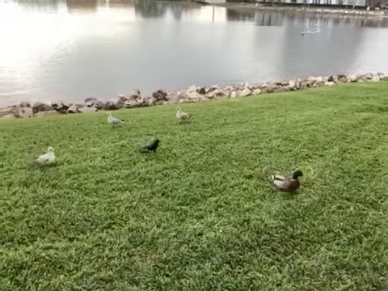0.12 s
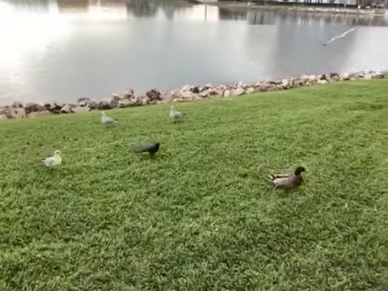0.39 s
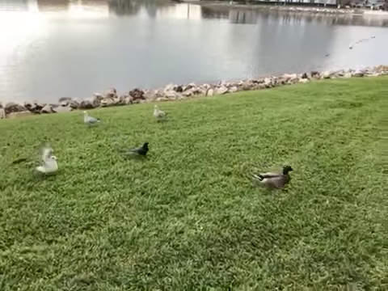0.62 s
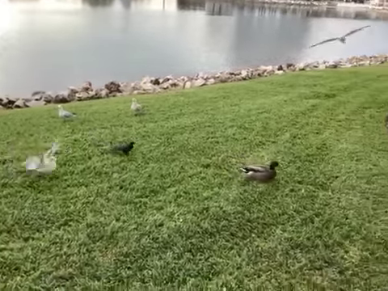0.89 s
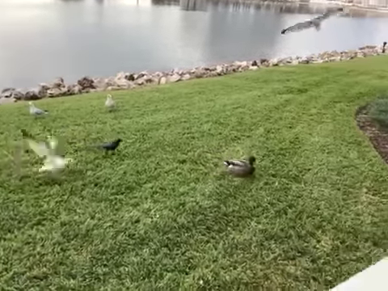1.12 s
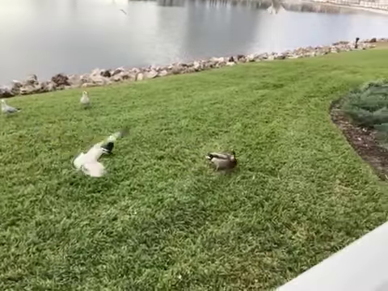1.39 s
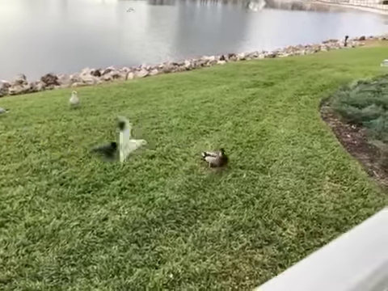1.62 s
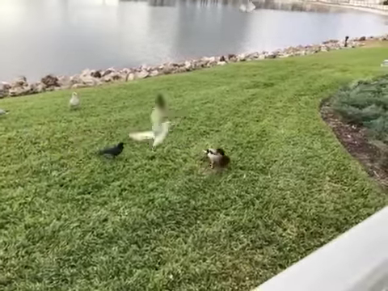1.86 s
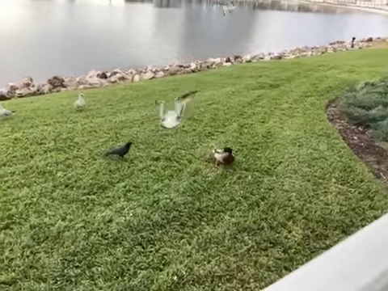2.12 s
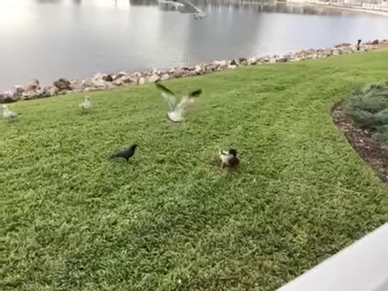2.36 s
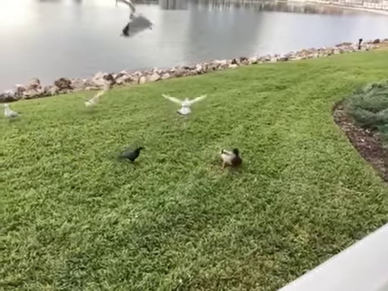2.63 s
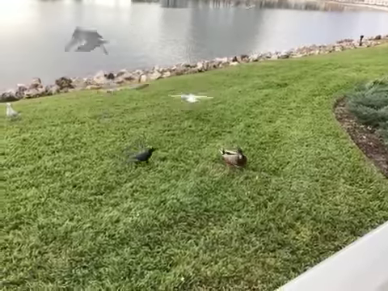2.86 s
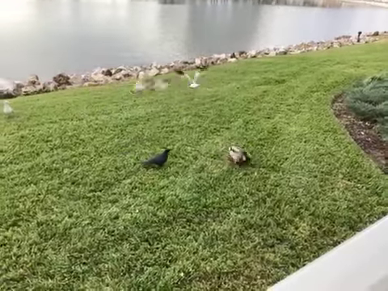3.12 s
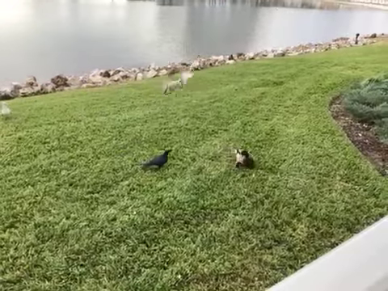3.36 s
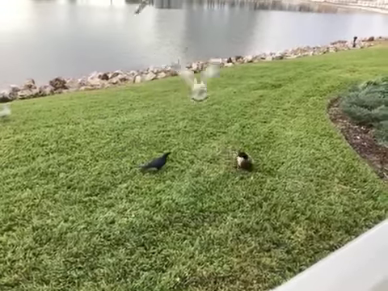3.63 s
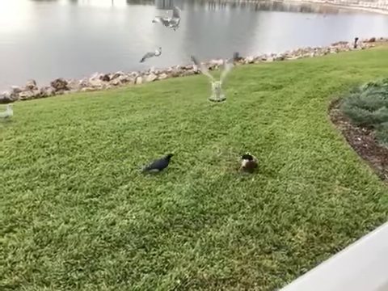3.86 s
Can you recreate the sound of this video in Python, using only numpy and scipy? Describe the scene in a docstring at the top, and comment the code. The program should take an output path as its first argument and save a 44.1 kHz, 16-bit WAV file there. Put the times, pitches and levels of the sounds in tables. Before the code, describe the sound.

Sharp gull cries over rough crow caws, faint quacking and a low outdoor rumble

```python
"""Gulls cry twice over a lawn beside a pond: two pitched sides of the syrinx sound at once and mix,
giving sum and difference tones. A crow caws three times and a duck quacks softly throughout, both
made of membrane pulses and puffs of noise through a throat or bill; a far bird calls faintly the same way.
Town rumble and airy hiss, shaped from noise, lie under all, with short noise-tail echoes off the bank."""
import sys
import numpy as np
from scipy import signal
from scipy.fft import rfft, irfft
from scipy.io import wavfile
from scipy.ndimage import uniform_filter1d, map_coordinates

SR = 44100
rng = np.random.default_rng(int(sys.argv[2]) if len(sys.argv) > 2 else 0)


def invert_db(level):
    """Linear amplitude ratio for a level in decibels (20 dB per decade), elementwise."""
    return 10 ** (np.asarray(level, dtype=float) / 20)


def master(y):
    """Save y as 16-bit WAV."""
    cut = np.clip(np.atleast_2d(y).T, -1, 1)
    pcm = np.round(cut * 32767)  # scale
    wavfile.write(sys.argv[1], SR, pcm.astype(np.int16))


N = 176400
T = np.arange(N) / SR  # seconds


def unit(x):
    """Scaled to rms 1."""
    return x / np.sqrt(np.mean(x ** 2) + 1e-20)


def along(points, hz):
    """Reads a curve of (Hz, value) points on a log frequency axis."""
    f, v = np.transpose(points)
    return np.interp(np.log(hz + 1), np.log(f + 1), v)


def wobble(rate):
    """A smooth random curve, rate knots a second."""
    return map_coordinates(rng.standard_normal(N // 20), [T * rate])


def spell(start, end):
    """A gate from 0 to 1 that fades in and out between two times in seconds."""
    return np.clip(np.minimum(T - start, end - T) / 0.018, 0, 1)


def coloured(x, points):
    """Filters x to the gain of (Hz, dB) points; a pulse swells and fades, its lows a little late."""
    size = 4096
    smear = 7  # phase lag in radians per unit of log frequency
    hz = np.fft.rfftfreq(size, 1 / SR)
    response = invert_db(along(points, hz)) * np.exp(-1j * smear * np.log(hz + 1))
    kernel = np.fft.fftshift(irfft(response, size))
    return signal.fftconvolve(x, kernel)[size // 2:][:N]


# Spectrum of the town rumble and hiss. Each row: frequency in Hz, relative level in dB.
AIR_SPECTRUM = [(25, -46), (39, -15), (60, 0), (115, 2.5), (160, -0.5), (250, -9.5), (420, -9),
                (800, -13.5), (1600, -17), (2500, -21), (4000, -25), (6300, -27.5), (8000, -26),
                (10000, -15), (12500, -30), (15700, -38)]


def air(level_db=-44.5, patchy_db=1, drift_db=.6):
    """Town rumble and hiss: shaped noise, slightly patchy in time and pitch, drifting in level."""
    z = signal.stft(rng.standard_normal(N), nperseg=512)[2]
    patches = uniform_filter1d(rng.standard_normal(z.shape), size=8, axis=0)
    patches = uniform_filter1d(patches, size=14, axis=1)
    noise = signal.istft(z * invert_db(patchy_db * unit(patches)), nperseg=512)[1][:N]
    gain = invert_db(along(AIR_SPECTRUM, np.fft.rfftfreq(N, 1 / SR)))
    shaped = irfft(rfft(noise) * gain, N)
    return invert_db(level_db + drift_db * wobble(2.633)) * unit(shaped)


# How long the bank echoes. Each row: frequency in Hz, time to die by 60 dB in seconds.
BANK_DECAY = [(500, 0.23), (4000, 0.34), (10000, 0.26)]


def bank(x):
    """Scattered echoes: a noise tail, each frequency dying at its own speed."""
    hz, t, z = signal.stft(rng.standard_normal(SR // 2), SR, nperseg=256)
    fade = invert_db(-60 * t / along(BANK_DECAY, hz)[:, None])
    tail = signal.istft(z * fade, SR, nperseg=256)[1]
    late = np.pad(x, (400, 0))  # delay in samples
    return signal.fftconvolve(late, tail / np.linalg.norm(tail))[:N]


def calls(rows, throat, attack_s, release_s, sag, noise, duty, jitter, scatter_db, arch=0,
          voiced=((1000, 0),)):
    """Membrane pulses with a puff of noise each cycle; the rate arches and sags, the bill opens."""
    gape_hz, gape_shift = 2200, .07  # an open bill lifts resonances above gape_hz by this share
    rate, level, gape = np.full(N, float(rows[0][2])), np.zeros(N), np.zeros(N)
    chances = rng.uniform(-1, 1, (len(rows), 2))
    for (s, length, hz, db), (start, detune) in zip(rows, chances):
        u = np.clip((T - s) / length, 0, 1)  # progress through the call
        begun = T > s - .01
        bend = 1 + jitter * detune - sag * (u - .5) + arch * np.sin(np.pi * u)
        rate = np.where(begun, hz * bend, rate)
        gape = np.where(begun, np.clip(u + start / 2, 0, 1), gape)
        ramp = np.minimum((T - s) / attack_s, 1 + (s + length - T) / release_s)
        level += invert_db(db) * np.sin(np.pi / 2 * np.clip(ramp, 0, 1)) ** 2
    turns = np.cumsum(rate * (1 + jitter * wobble(250))) / SR  # membrane cycles so far
    nearest = np.round(turns)
    size = invert_db(scatter_db * rng.standard_normal(N))[nearest.astype(int)]  # one strength per cycle
    pulses = np.diff(np.floor(turns), prepend=0) * size
    puffs = rng.standard_normal(N) * np.exp(-np.abs(turns - nearest) / duty) * size
    source = np.sqrt(1 - noise) * coloured(unit(pulses), voiced) + np.sqrt(noise) * unit(puffs)
    wide = [(hz * (1 + gape_shift * (hz > gape_hz)), db) for hz, db in throat]
    shut, opened = np.sqrt(1 - gape), np.sqrt(gape)
    voice = coloured(shut * source, throat) * shut + coloured(opened * source, wide) * opened
    return level * unit(voice)


# Faint calls. Each row: start in seconds, length before the fade in seconds,
# nominal pulse rate in Hz, level in dB.
FAR_CALLS = [(.875, 0.066, 438, -45.5), (.95, 0.086, 405.6, -45.5), (2.01, 0.059, 437, -44.5)]
# Throat resonances of the far bird. Each row: frequency in Hz, gain in dB.
FAR_RESONANCES = [(500, -30), (850, -15), (1250, 0), (1650, -17), (2350, -9), (3300, -35)]


def far_bird():
    """Short, nearly pure pulsed calls: quick attack, falling rate, little noise."""
    return calls(FAR_CALLS, FAR_RESONANCES, attack_s=0.0027, release_s=0.021, sag=.16,
                 noise=.06, duty=0.48, jitter=.006, scatter_db=1.5)


# Soft quacks. Each row: start in seconds, level in dB.
QUACK_TIMES = [(0.361, -49.5), (0.532, -47), (0.934, -44), (1.097, -38.5), (1.384, -37.5), (1.675, -38.5),
               (1.816, -37.5), (2.125, -38.5), (2.278, -38), (2.58, -41), (2.74, -38.5), (3.079, -42.5),
               (3.244, -38.5), (3.539, -38), (3.698, -35.5), (3.948, -39.5)]
# Bill resonances of the duck. Each row: frequency in Hz, gain in dB.
QUACK_RESONANCES = [(700, -61), (1400, -11.5), (1930, 2.5), (2400, -5), (2900, -11), (3500, -19.5),
                    (4500, -16), (4900, -10.5), (5600, -10.5), (6800, -16), (8500, -39)]
# Tone of the pulses, which fade under the noise in the treble. Each row: frequency in Hz, gain in dB.
QUACK_PULSE_TONE = [(2500, -6), (4500, -13)]


def duck():
    """Slow membrane pulses with tight puffs of noise, ringing the bill."""
    length_s, pulse_hz = .045, 118.05  # before the fade; nominal rate
    quacks = [(s, length_s, pulse_hz, db) for s, db in QUACK_TIMES]
    return calls(quacks, QUACK_RESONANCES, attack_s=.018, release_s=.035, sag=.05,
                 noise=.42, duty=.25, jitter=.04, scatter_db=1.5, voiced=QUACK_PULSE_TONE)


# Caws. Each row: start in seconds, length before the fade in seconds,
# nominal pulse rate in Hz, level in dB.
CAW_CALLS = [(.66, 0.16, 307.5, -30.5), (1.1, 0.16, 316.2, -30.5), (1.555, 0.155, 317, -31.5)]
# Throat resonances of the crow. Each row: frequency in Hz, gain in dB.
CAW_RESONANCES = [(1000, -23), (1250, -13.5), (1560, -2.5), (1900, -14.5), (2600, -27), (3550, -30),
                  (4000, -9.5), (4400, -21), (5450, -6.5), (6300, -11.5), (9000, -4.5), (10200, -1),
                  (11600, -18), (15500, -39)]
# Tone of the pulses, which lead the noise in the low resonance. Each row: frequency in Hz, gain in dB.
CAW_PULSE_TONE = [(2200, 6.5), (4500, -2)]


def crow():
    """Rough caws: fast pulses and about as much noise, the rate arching slightly as it falls."""
    return calls(CAW_CALLS, CAW_RESONANCES, attack_s=.07, release_s=.065, sag=.13,
                 noise=.55, duty=.48, jitter=.015, scatter_db=1.5, arch=.03, voiced=CAW_PULSE_TONE)


def syrinx(cries, partials, spells=(), halved=0):
    """One side of the gull: trembling partials on its pitch, fluttering and hoarse in spells."""
    pivot_hz, onset_s = 4140, 0.011  # brightness turns about pivot_hz
    jitter, hoarse_jitter = 0.00345, .024  # share of the pitch
    tremble_db, chatter_db = 3, 7  # hoarse partials break up
    upper_lean, hoarse_depth = .9, 1.2  # the upper flutter side tones lead
    out = np.zeros(N)
    waver = np.cumsum(1 + .06 * wobble(40)) * 2 * np.pi / SR  # unsteady clock for the flutter
    rough = sum(spell(a, b) * hoarse for a, b, _, _, hoarse in spells)
    swell = sum(spell(a, b) * depth * (2 * np.cos(hz * waver) + np.cos(2 * hz * waver))
                for a, b, depth, hz, _ in spells)
    sway = sum(spell(a, b) * depth * upper_lean * np.sin(hz * waver) for a, b, depth, hz, _ in spells)
    for rows, levels in zip(cries, partials):
        s, *cols = np.transpose(rows)
        hz, db, bright_db = [np.interp(T, s, c) for c in cols]
        unsteady_hz = hz * (1 + (jitter + hoarse_jitter * rough) * wobble(300))
        phase = 2 * np.pi * np.cumsum(unsteady_hz) / SR
        gate = np.clip(np.minimum(T - s[0], s[-1] - T) / onset_s, 0, 1)
        tone = np.zeros(N)
        for k, partial_db in enumerate(levels, 1):
            tilt_db = bright_db * np.log2(k * hz / pivot_hz)
            shake_db = (tremble_db + chatter_db * rough) * wobble(120)
            wave = np.sin(k * phase + sway + rng.uniform(0, 2 * np.pi))
            tone += invert_db(partial_db + tilt_db + shake_db) * wave
        beat = 1 + swell + 2 * halved * np.cos(phase / 2) + hoarse_depth * rough * wobble(600)
        out += gate * invert_db(db) * np.sqrt(2) * tone * beat
    return out


# Low side of the syrinx, one list per cry section.
# Each row: time in seconds, pitch in Hz, level before partials and tilt in dB, brightness in dB per octave.
LOW_CRIES = [
    [(1.776, 1527, -52, 22), (1.782, 1481, -22, -2), (1.796, 1517, -20.5, 0.5), (1.882, 1511, -49, 22),
     (1.898, 1506, -37, -4), (1.945, 1550, -65, 16)],
    [(1.935, 1447, -30, 2), (1.955, 1383, -38, 2), (2.085, 1265, -49, -2), (2.12, 1270, -77, 4)],
    [(3.236, 1967, -66, -2), (3.246, 1945, -19, 4.5), (3.27, 1828, -24, 4.5), (3.305, 1863, -31.5, -20)],
    [(3.455, 1554, -41, 6.5), (3.553, 1664, -36, 4), (3.6, 1720, -38, -1)],
    [(3.583, 1785, -49, -13), (3.603, 1754, -34, 5.5), (3.629, 1642, -37.5, 6), (3.649, 1623, -32.5, 4.5),
     (3.771, 1755, -34.5, 0), (3.789, 1708, -36, -4.5), (3.813, 1644, -46, -1), (3.847, 1640, -35, 0.5),
     (3.903, 1662, -45.5, -1.5), (3.925, 1720, -40.5, 5), (3.99, 1730, -67, -18)],
]
# Relative levels in dB of partials 1 to 8, one list for each low section.
LOW_PARTIALS = [
    [-34, 0, -26, -8, -21, -14, -34, -40],
    [-5, 2, -14, 0, -7, -5.5, -12.5, -14.5],
    [-24, 1.5, -18, -5.5, -28, -24, -53, -55],
    [-23, -9, 1.5, -34, -8.5, -7.5, -19, -22],
    [-5.5, 3, -1.5, -6.5, -8, 2, -18, -27],
]
# Flutter of the low side. Each row: start in seconds, end in seconds, depth 0-1, flutter rate in Hz,
# hoarseness 0-1.
LOW_FLUTTERS = [(1.791, 1.952, 0.05, 590, 0.28), (1.961, 2.12, 0.28, 447.5, 0.36),
                (3.482, 3.577, 0.17, 492, .1), (3.689, 3.775, 0.24, 544, 0.12),
                (3.783, 3.873, 0.36, 458.4, 0.22), (3.885, 3.97, 0.45, 487, 0.19)]
# High side of the syrinx, one list per cry section.
# Each row: time in seconds, pitch in Hz, level before partials and tilt in dB, brightness in dB per octave.
HIGH_CRIES = [
    [(1.772, 4130, -50, 6), (1.798, 4150, -46, 0), (1.81, 4110, -38.5, -4.5), (1.86, 4345, -44, 4),
     (1.92, 4473, -51.5, 10.5), (1.97, 4487, -59, 6)],
    [(3.222, 4830, -87, 13), (3.236, 4970, -54, 16.5), (3.256, 5800, -84, 7)],
    [(3.302, 4460, -43, -21), (3.312, 4498, -21.5, -7.5), (3.384, 4330, -39, -5),
     (3.408, 4182, -36.5, -1.5), (3.464, 4192, -42, 2), (3.508, 4327, -34, -9.5), (3.548, 4510, -36, -1.5),
     (3.62, 4513, -47, -5)],
]
# Relative levels in dB of partials 1 to 3 of every high section.
HIGH_PARTIALS = [9, 10, -16]
# The high side repeats only every second cycle. One row: start in seconds, end in seconds, depth 0-1.
HALVED_SPELL = (3.336, 3.47, 0.2)
# Tone filter on the mixing tones and breath, bright around 7 to 10 kHz as the microphone hears it.
# Each row: frequency in Hz, gain in dB.
GULL_TONE = [(900, -13.5), (2000, 3), (4000, -6.5), (7000, 12.5), (10000, 13.5), (13000, -26), (16000, 13)]


def gulls(sides_mix_db=-9, breath_db=-37):
    """Both sides, with their sum and difference tones and a little air noise through a bright tone filter."""
    start, end, depth = HALVED_SPELL
    low = syrinx(LOW_CRIES, LOW_PARTIALS, LOW_FLUTTERS)
    high = syrinx(HIGH_CRIES, [HIGH_PARTIALS] * len(HIGH_CRIES), halved=depth * spell(start, end))
    effort = np.sqrt(np.abs(uniform_filter1d((low + high) ** 2, size=400)))  # running loudness
    mixed = invert_db(sides_mix_db) * low * high / (effort + 1e-4)  # the product makes the mixing tones
    breath = invert_db(breath_db) * effort * rng.standard_normal(N)
    return low + high + coloured(mixed + breath, GULL_TONE)


def scene():
    """All birds, their echoes and the background."""
    echo_db = -7.5
    birds = far_bird() + duck() + crow() + gulls()
    return (birds + invert_db(echo_db) * bank(birds) + air())[None]


def low_pass(x):
    """Removes everything above the highest recorded frequency."""
    return signal.sosfilt(signal.butter(12, 15750, fs=SR, output="sos"), x)


def record(dry):
    """The finished mix as it is heard."""
    return low_pass(dry)


dry = scene()
out = record(dry)
master(out)
```